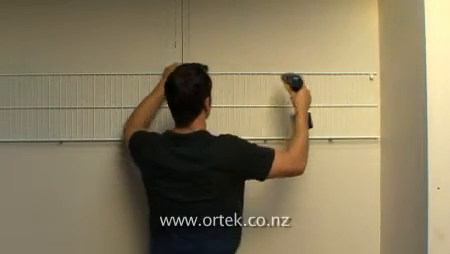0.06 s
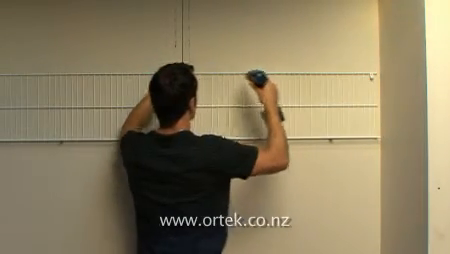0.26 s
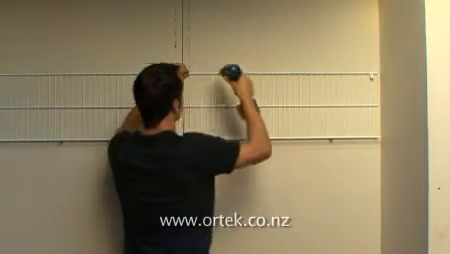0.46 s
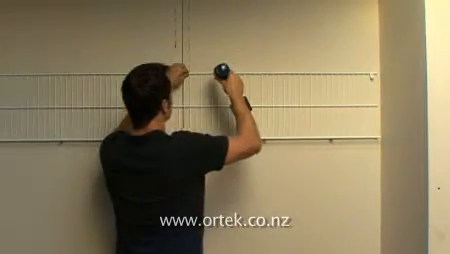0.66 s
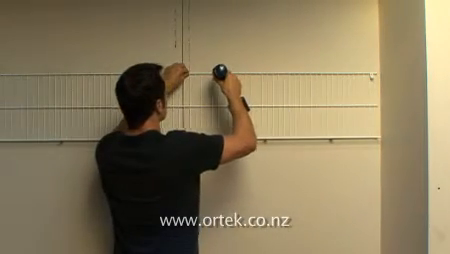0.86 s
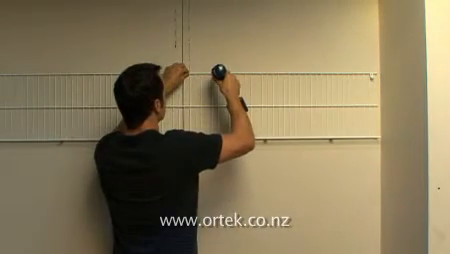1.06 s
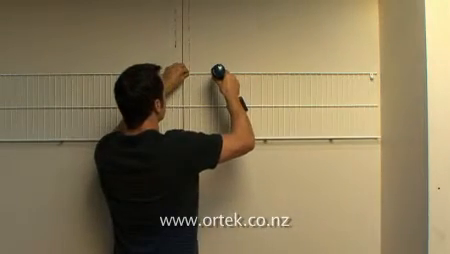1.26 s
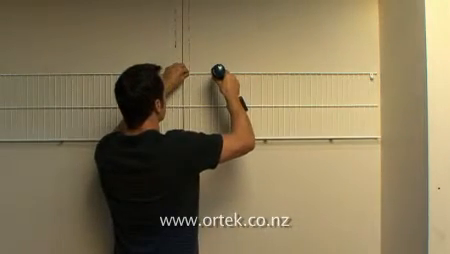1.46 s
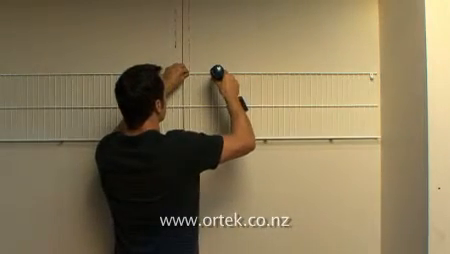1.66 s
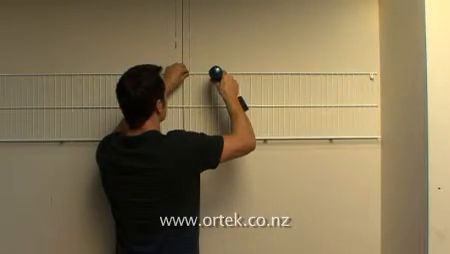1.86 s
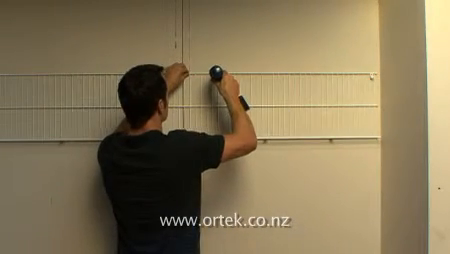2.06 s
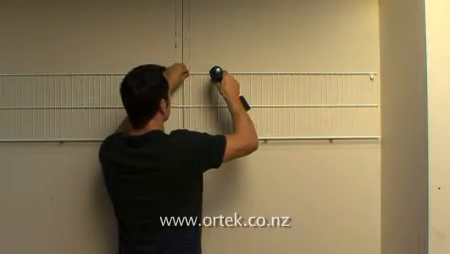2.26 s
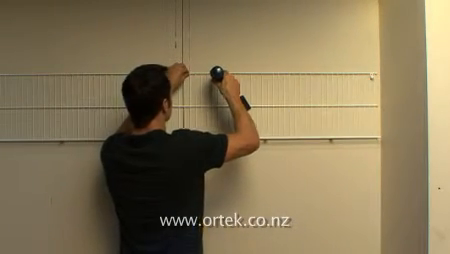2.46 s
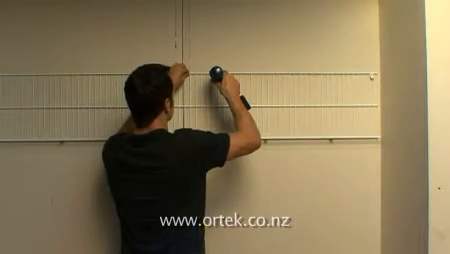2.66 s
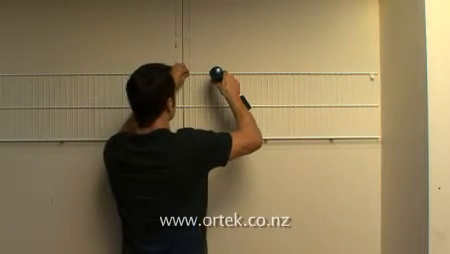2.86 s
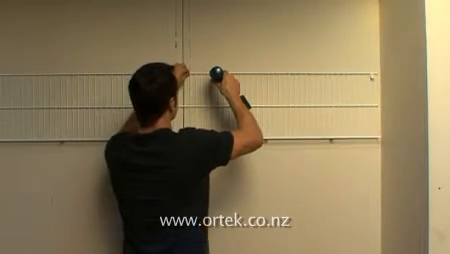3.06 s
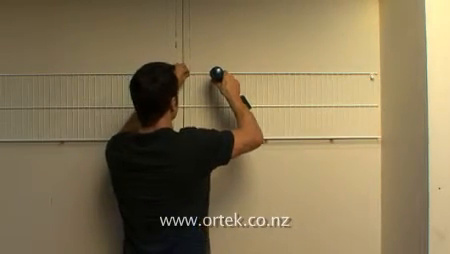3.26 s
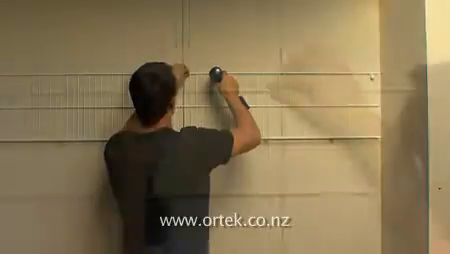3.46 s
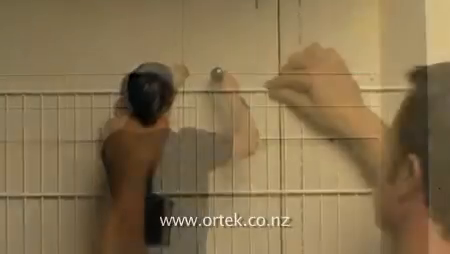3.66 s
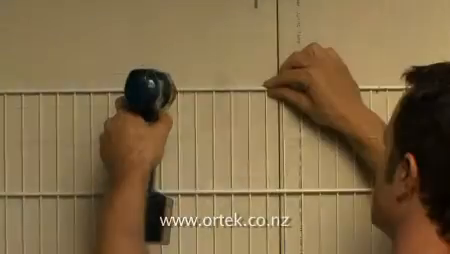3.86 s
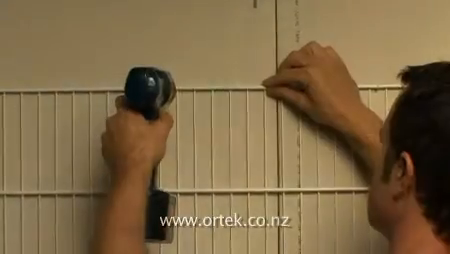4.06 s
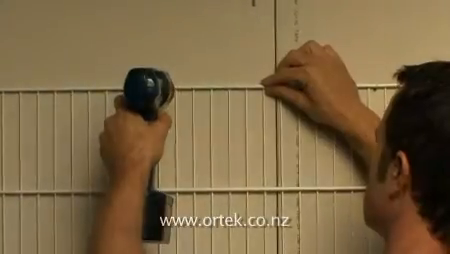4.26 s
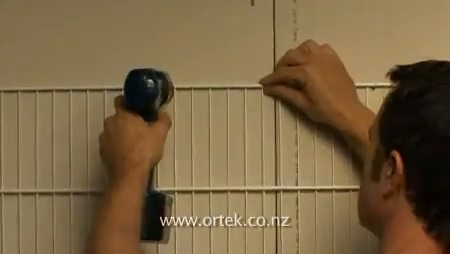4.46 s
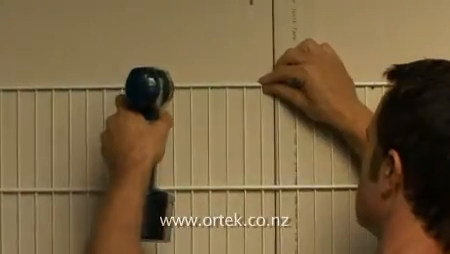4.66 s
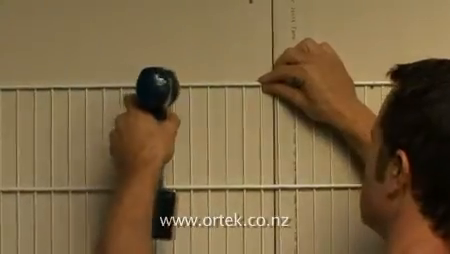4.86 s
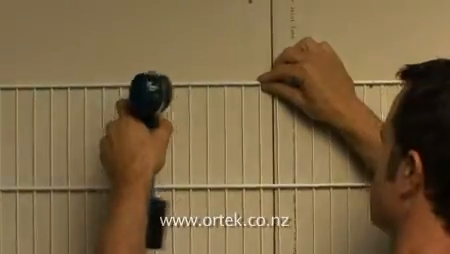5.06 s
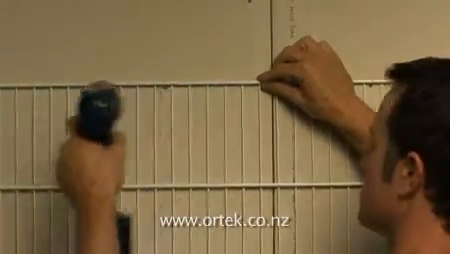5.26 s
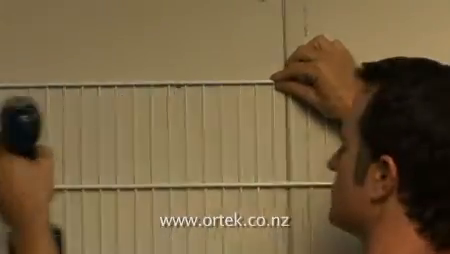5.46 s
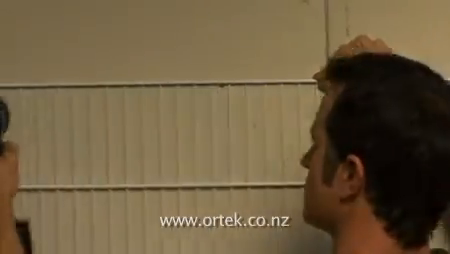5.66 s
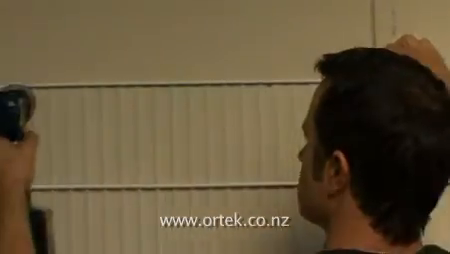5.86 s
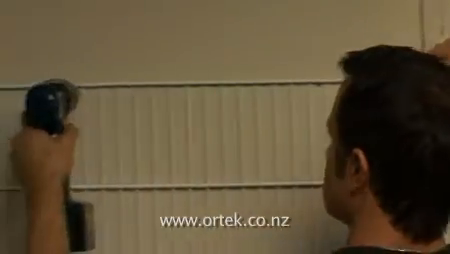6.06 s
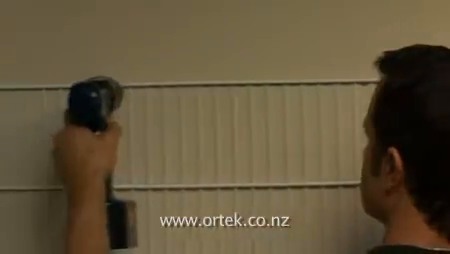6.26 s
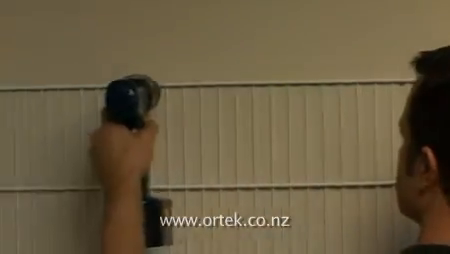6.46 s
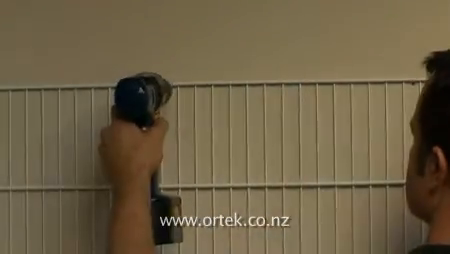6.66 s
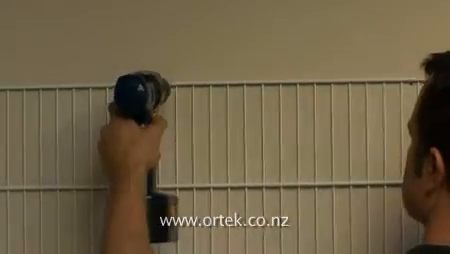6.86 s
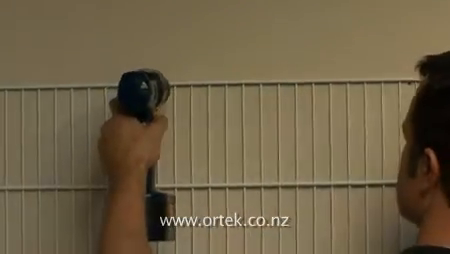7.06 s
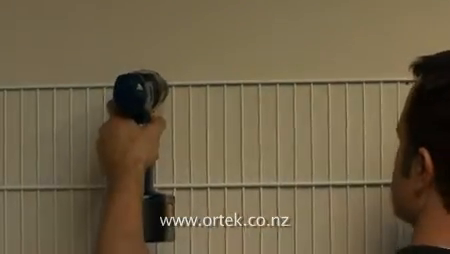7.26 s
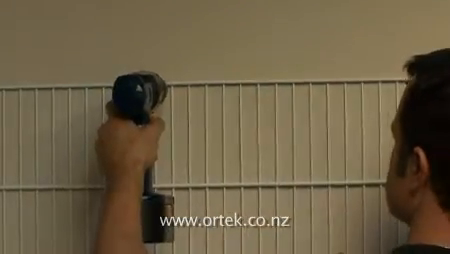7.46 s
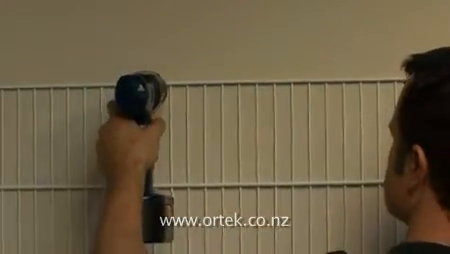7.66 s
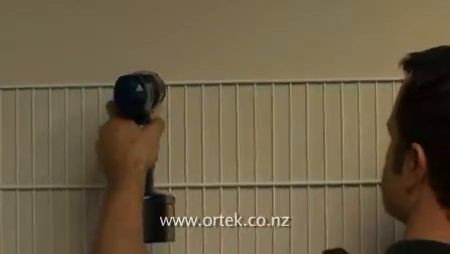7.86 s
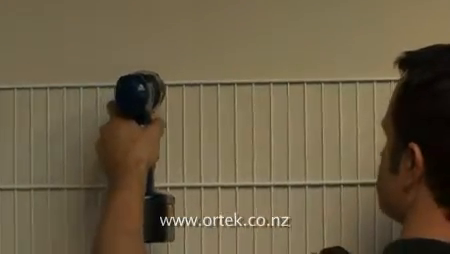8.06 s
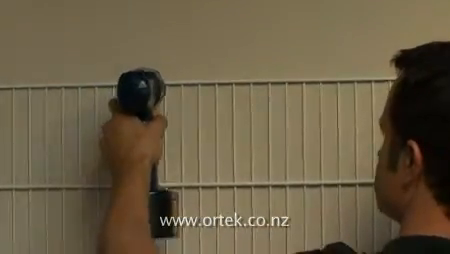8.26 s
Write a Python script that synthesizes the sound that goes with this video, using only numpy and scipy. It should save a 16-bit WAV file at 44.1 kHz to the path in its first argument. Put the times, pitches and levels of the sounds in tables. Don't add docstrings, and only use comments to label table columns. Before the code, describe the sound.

A cordless drill works on plasterboard in a small boxy space, picked up by a camera microphone. Quiet hiss, low stirring and dull bumps come first, then a somewhat distant drill run with rising motor whine and gear rattle. The scene changes and a short, brighter, closer run follows, stopping sharply. Fist bumps and a wire rattle fill the pause before a last close run, with an early thump through the wall.

```python
import sys
import numpy as np
from scipy import signal
from scipy.fft import rfft, irfft, next_fast_len
from scipy.io import wavfile
from scipy.ndimage import uniform_filter1d

SR = 44100
rng = np.random.default_rng(int(sys.argv[2]) if len(sys.argv) > 2 else 0)


def put_to_file(sound):
    columns = np.atleast_2d(sound).T
    safe = np.clip(columns, -1, 1)
    whole_steps = np.round(safe * 32767)
    wavfile.write(sys.argv[1], SR, whole_steps.astype(np.int16))


def gain_from_decibels(decibels):
    exponent = np.asarray(decibels, float) / 20
    return 10 ** exponent


N = 366912
T = np.arange(N) / SR

# f/Hz, level per Hz/dB
NOISE_FAR = [(24, -47), (40, -23), (107, 1), (154, -5.5), (404, 0), (502, -4.5), (566, 0.5), (654, -11.5),
             (853, -4.5), (1350, -12), (1890, -8.5), (2080, -11.5), (3370, -7), (11800, -14.5),
             (12700, -12), (16500, -58), (22000, -120)]
# f/Hz, width/Hz, lift/dB
HOUSING = [(3180, 280, 5), (3450, 150, 4), (4040, 200, 1.5), (5100, 660, 4), (6580, 97, 8.5),
           (7860, 135, 7), (11500, 590, 3)]


def unit(x):
    return x / np.sqrt(np.mean(x ** 2) + 1e-20)


def along(points, hz):
    f, v = np.transpose(points)
    return np.interp(np.log(hz + 1), np.log(f + 1), v)


def filtered(x, response):
    m = next_fast_len(len(x) + SR // 2)
    return irfft(rfft(x, m) * response(np.fft.rfftfreq(m, 1 / SR)), m)[:len(x)]


def wobble(n, rate):
    knots = rng.standard_normal(int(n * rate / SR) + 2)
    curve = np.interp(np.arange(n) * rate / SR, np.arange(len(knots)), knots)
    return uniform_filter1d(curve, int(SR / rate / 2) + 1)


def peaks_db(modes, hz):
    return sum(db / (1 + (2 * (hz - c) / w) ** 2) for c, w, db in modes)


def resonances(modes):
    def response(f):
        total = 0
        for k, (c, w, db) in enumerate(modes):
            total = total + (-1) ** k * gain_from_decibels(db) * 1j * f * w / (c * c - f * f + 1j * f * w)
        return total
    return response


def patchy(x, depth_db):
    z = signal.stft(x, nperseg=256)[2]
    field = uniform_filter1d(rng.standard_normal(z.shape), size=3, axis=0)
    field = uniform_filter1d(field, size=12, axis=1)
    return signal.istft(z * gain_from_decibels(depth_db * unit(field)), nperseg=256)[1][:len(x)]


def add(track, s, x):
    k = round(s * SR)
    track[k:k + len(x)] += x[:len(track) - k]


def drill():
    # t/s, motor load level/dB, pressure on the wall level/dB
    efforts = [
        [(2.03, -52, -57), (2.07, -46.5, -49), (2.16, -34, -51), (2.24, -33.5, -41.5), (2.6, -32, -35.5),
         (2.85, -32.5, -38.5), (3.05, -31.5, -36), (3.3, -33, -37.5), (3.628, -34, -38.5)],
        [(3.96, -49, -44), (4, -49, -42.5), (4.1, -36, -51), (4.17, -33, -43.5), (4.56, -32, -44),
         (4.82, -32.5, -38), (5, -33, -38.5), (5.085, -33, -35.5), (5.105, -43, -36)],
        [(6.93, -54, -59), (6.98, -43.5, -54), (7.09, -35, -43), (7.16, -30.5, -37.5), (7.24, -31, -30),
         (7.33, -30, -36), (7.7, -31, -37.5), (8.2, -32, -39), (8.32, -29.5, -37)],
    ]
    # start t/s, top speed/(turns/s), climb/(turns/s), climb time/s,
    # climb shape, creep/(turns/s), creep time/s
    spin_up = [(2.04, 357.7, 190, .14, .98, 97.96, 1.219),
               (3.97, 375.76, 182.5, .1447, 1.67, 114.24, 2.962),
               (6.94, 299.74, 154.18, .1576, 1.686, 68.04, .415)]
    pattern_lengths = (1.5, 1, 1)
    # rattle level/dB, air level/dB
    rattle_air = [(-5, -2), (-2.5, 2), (-4, -1)]
    # multiple of shaft speed, level off resonance/dB
    orders_free = [(2, -55.5), (5, -51), (6, -44.5), (8, -49.5), (10, -54), (12, -56), (14, -53),
                   (16, -54.5), (18, -53), (20, -54.5), (20.67, -60), (21.33, -60), (22, -50.5), (24, -53),
                   (24.67, -59), (30, -57), (32, -59), (32.67, -60), (34.67, -61), (36, -62), (36.67, -64),
                   (37.33, -66), (38.67, -65)]
    # multiple of shaft speed, level off resonance in second run/dB, in third run/dB
    orders_geared = [(1, -54, -50), (3, -58, -62), (5, -50.5, -55), (6, -47.5, -48.5), (7.5, -50, -47),
                     (9, -47, -46), (11, -55, -62), (12, -54, -52), (15, -47, -45.5), (18, -58, -54),
                     (21, -53, -54), (23, -55, -57), (24, -47.5, -49.5), (26, -60, -56), (27, -52, -49),
                     (28, -53, -48.5), (29, -63, -54), (30, -56, -54), (32, -57, -57), (33, -54, -54),
                     (34, -58, -56), (35, -56, -57), (36, -52.5, -52.5), (37, -57.5, -64), (38, -66, -58),
                     (39, -52, -52), (40, -68, -64), (41, -64, -62), (42, -64, -60)]
    # f/Hz, level per Hz/dB
    noise_near = [(24, -48), (40, -26.5), (91, -12.5), (288, -14), (670, -12), (853, -3.5), (1600, -11),
                  (1720, -8), (3450, -1), (3890, -2.5), (4180, -1), (5590, -7), (6610, -9), (11500, -13.5),
                  (12700, -13), (16500, -52), (22000, -120)]
    noise, tones = np.zeros((2, N))
    multiple, second_db, third_db = np.transpose(orders_geared)
    stacks = (np.transpose(orders_free), (multiple, second_db), (multiple, third_db))
    spectra = (NOISE_FAR, noise_near, noise_near)
    runs = zip(spin_up, stacks, pattern_lengths, efforts, rattle_air, spectra)
    for law, orders, pattern_turns, effort, offsets_db, spectrum in runs:
        rush, song = run(law, orders, pattern_turns, effort, offsets_db, spectrum)
        add(noise, effort[0][0], rush)
        add(tones, effort[0][0], song)
    return noise, tones


def run(law, orders, pattern_turns, effort, offsets_db, spectrum):
    # low f/Hz, high f/Hz
    bands = [(2500, 6000), (40, 600), (600, 2500), (6000, 13000)]
    # f/Hz, width/Hz, lift/dB
    singing = [(555, 190, 20), (640, 90, -24), (810, 130, 14), (1975, 150, 8), (3200, 320, 9),
               (4105, 250, 17.5), (4315, 130, 8), (5750, 800, 7), (6340, 200, 8), (6640, 260, 13),
               (7090, 80, 8), (7680, 420, 8), (8110, 200, 6), (11600, 650, 12)]
    s, *cols = np.transpose(effort)
    t = np.arange(s[0], s[-1], 1 / SR)
    n = len(t)
    load_db, wall_db = [np.interp(t, s, c) for c in cols]
    turns = spin(law, t)
    octaves = np.log2(turns / turns.max())
    angle = 2 * np.pi * np.cumsum(turns * (1 + 0.00042 * wobble(n, 39.9))) / SR
    noise, tones = np.zeros((2, n))

    rattle_db = load_db + offsets_db[0] - 2 * octaves
    air_db = load_db + offsets_db[1] + 2.5 * octaves
    throb = 1 + .35 * np.cos(angle) + .3 * np.cos(2 * angle + 1.3)
    rattle = gain_from_decibels(-9) * meshing(angle, pattern_turns)
    for (lo, hi), db in zip(bands, [load_db, wall_db, rattle_db, air_db]):
        rush = rng.standard_normal(n)
        if lo > 2000:
            rush = rush * throb + rattle

        def band(hz):
            edges = np.sqrt((1 + (lo / (hz + 1)) ** 8) * (1 + (hz / hi) ** 8))
            return gain_from_decibels(along(spectrum, hz)) * housing(hz) / edges
        flutter_db = 1.88 * wobble(n, 25.05) + 0.43 * wobble(n, 6.96)
        noise += gain_from_decibels(db - 3.5 + flutter_db) * unit(filtered(rush, band))

    drive_db = .6 * (load_db - np.median(load_db))
    lift_db = peaks_db(singing, np.arange(SR // 2))
    for order, db in zip(*orders):
        speed_db = 20 * min(order / 18, 1) * octaves
        sung_db = lift_db[(order * turns).astype(int)]
        unsteady_db = 1.2 * wobble(n, 8) + 2 * wobble(n, 19.46)
        level_db = db + drive_db + speed_db + sung_db + unsteady_db
        tones += gain_from_decibels(level_db + 2.5) * np.sin(order * angle + 2 * np.pi * rng.random())
    fade = np.clip(np.minimum((t - s[0]) / 0.011, (s[-1] - t) / 0.0023), 0, 1)
    return np.array([patchy(noise, depth_db=1.5), tones]) * fade


def spin(law, t):
    bind_s, sag = 4.99, 2500
    start, top, climb, climb_s, shape, creep, creep_s = law
    u = np.maximum(t - start, 0)
    bound = np.maximum(t - bind_s, 0) * (start < bind_s)
    return top - climb * np.exp(-(u / climb_s) ** shape) - creep * np.exp(-u / creep_s) - sag * bound ** 2


def meshing(angle, pattern_turns):
    place = (angle / (2 * np.pi * pattern_turns) % 1 * 128).astype(int)
    patterns = rng.standard_normal((5, 128))[:, place]
    shares = np.array([wobble(len(angle), 6) for _ in patterns])
    return (shares * patterns).sum(0) / np.linalg.norm(shares, axis=0)


def housing(hz):
    return gain_from_decibels(peaks_db(HOUSING, hz))


def whines():
    # t/s, level/dB
    presses = [
        (2.009, -56),
        (3.932, -57),
        (6.906, -55.5),
    ]
    overtones_db = (-6, -14)
    start_hz, rise_hz_per_s, length_s, swell_db = 3370, 3300, .11, 8
    track, t = np.zeros(N), np.arange(round(length_s * SR)) / SR
    for s, db in presses:
        angle = 2 * np.pi * (start_hz + rise_hz_per_s * t / 2) * t + 1.6 * wobble(len(t), 197)
        buzz = np.zeros(len(t))
        for k, level in enumerate((0, *overtones_db), 1):
            buzz += gain_from_decibels(level + 2.0 * wobble(len(t), 110)) * np.sin(k * angle)
        fade = np.clip(np.minimum(t / 0.0042, (length_s - t) / .03), 0, 1)
        add(track, s, gain_from_decibels(db + swell_db * t / length_s) * fade * buzz)
    return track


def squeals():
    # t/s, peak level/dB, f/Hz, length/s, octave level/dB
    slips = [(0.154, -41.5, 324, 0.041, -13), (0.201, -49, 321.5, 0.078, -16), (6.393, -60, 428, .05, -9),
             (3.467, -21, 1460, 0.011, -29), (3.476, -23, 1456, 0.015, -27.5),
             (3.488, -23.5, 1400, 0.0094, -29), (3.495, -28, 1400, 0.02, -31),
             (3.515, -33, 1460, 0.0074, -28), (3.568, -18, 4940, .008, -29),
             (3.573, -12, 5080, 0.0046, -18), (3.588, -21.5, 5100, 0.0091, -23),
             (3.612, -32.5, 5180, .003, -16), (4.108, -33, 4100, 0.0096, -21),
             (4.11, -29.5, 3100, 0.028, -27), (6.938, -43, 5100, 0.016, -25),
             (8.307, -17.5, 6480, 0.0067, -32), (8.299, -21, 3960, 0.0067, -30),
             (8.31, -13, 3110, 0.0086, -24), (8.315, -15, 3450, 0.0046, -22)]
    track = np.zeros(N)
    for s, db, hz, length, octave_db in slips:
        u = np.arange(round(3 * length * SR)) / SR / length
        angle = 2 * np.pi * hz * u * length * (1 + 0.0092 * u) + 1.4 * wobble(len(u), 218)
        tone = np.sin(angle) + gain_from_decibels(octave_db) * np.sin(2 * angle)
        add(track, s, gain_from_decibels(db) * 4 * u * np.exp(1 - 4 * u) * tone)
    return track


def metal():
    # t/s, peak level/dB
    clicks = [(1.9669, -48), (2.0383, -37), (3.9709, -43.5), (5.084, -22), (6.8803, -50.5), (6.8922, -48),
              (6.94, -41), (6.9548, -44)]
    # t/s, peak level/dB
    clinks = [
        (1.3285, -45.5),
        (6.3871, -34),
    ]
    # f/Hz, width/Hz, level/dB
    wire_sets = [
        [(2390, 320, -2.5), (5100, 200, 4), (5700, 560, -1), (7740, 800, -6)],
        [(2100, 320, -15), (2640, 26, 5), (4900, 270, -5.5), (5400, 60, -3), (6030, 480, -7), (7160, 270, 0.5),
         (7840, 440, -5), (11100, 900, -19)],
    ]
    track, t = np.zeros(N), np.arange(SR // 2) / SR
    case = resonances([(hz, 1.6 * width, db) for hz, width, db in HOUSING])
    for s, db in clicks:
        snap = gain_from_decibels(db - 6.5 - 60 * t / 0.037) * rng.standard_normal(len(t))
        add(track, s, filtered(snap, case))
    for (s, db), wires in zip(clinks, wire_sets):
        decay = gain_from_decibels(-60 * t / 0.37) + 0.55 * gain_from_decibels(-60 * t / 0.034)
        rattle = decay * rng.standard_normal(len(t))
        add(track, s, gain_from_decibels(db - 0.5) * filtered(rattle, resonances(wires)))
    return track


def bumps():
    # t/s, peak level/dB, hardness level/dB
    knocks = [(0.718, -59, 2), (1.232, -33.5, -14), (1.358, -58, -13), (1.531, -35.5, -28),
              (1.654, -54, -14), (1.827, -50, -11), (1.88, -51, -23), (5.128, -36, -6), (5.23, -56, -20),
              (5.459, -51, -5.5), (6.499, -45, -12), (6.549, -34.5, -22), (6.575, -48, -7)]
    # t/s, peak level/dB, hardness level/dB
    breakthrough = (7.189, -19, 4)
    # f/Hz, width/Hz, level/dB
    panel = [(104, 9, 3), (127, 10, 3), (230, 90, -12), (480, 120, -13), (880, 200, -12)]
    push, crack, t = np.zeros(N), np.zeros(N), np.arange(SR // 20) / SR
    for s, db, hard_db in [*knocks, breakthrough]:
        contact = np.hanning(180 if hard_db < 0 else 30) / 40
        add(push, s, gain_from_decibels(db + 39.5) * contact)
        add(crack, s, gain_from_decibels(db + hard_db + 9.5 - 60 * t / 0.088) * rng.standard_normal(len(t)))

    def crack_band(f):
        return 1j * f / 300 / (1 + 1j * f / 300) / (1 + 1j * f / 2300) ** 3
    return filtered(push, resonances(panel)) + filtered(crack, crack_band)


def tail():
    # f/Hz, time/s
    decay_times = [(100, 1), (500, 0.27), (2000, 0.44), (5000, 0.41), (12000, 0.2)]
    hz, t, z = signal.stft(rng.standard_normal(SR * 3 // 4), SR, nperseg=256)
    decay = gain_from_decibels(-60 * t / along(decay_times, hz)[:, None])
    x = signal.istft(z * decay, SR, nperseg=256)[1]
    return x / np.linalg.norm(x)


def room(send):
    before = T < 3.628

    def answer(part):
        return signal.fftconvolve(np.pad(part, (200, 0)), tail())[:N]
    return answer(send * before) * before + answer(send * ~before)


def background():
    # f/Hz, level per Hz/dB
    hush_spectrum = [(15, -42), (25, -19), (71, -3), (108, 0), (172, -20.5), (235, -8.5), (275, -22),
                     (357, -20), (541, -13), (601, -18), (936, -21.5), (7520, -27.5), (12700, -30.5),
                     (16500, -56.5), (22000, -120)]
    # t/s, level/dB
    stir_levels = [
        [(0.0, -47.5), (0.66, -61), (2.05, -61)],
        [(3.64, -55), (3.76, -63), (3.95, -63)],
        [(5.15, -63), (5.78, -65.5), (6.92, -62.5)],
    ]
    stir_spectrum = [(40, -37), (100, 0.0), (300, -4.0), (600, -11.0), (1200, -31.0)]  # f/Hz, level/dB
    hush = unit(filtered(rng.standard_normal(N), lambda hz: gain_from_decibels(along(hush_spectrum, hz))))
    s, db = np.transpose(np.vstack(stir_levels))
    stir = unit(filtered(rng.standard_normal(N), lambda hz: gain_from_decibels(along(stir_spectrum, hz))))
    echo = np.pad(tail(), (0, N))[:N]
    echo = filtered(echo, lambda hz: gain_from_decibels(along(NOISE_FAR, hz) - hz / 1500) * housing(hz))
    echo = gain_from_decibels(-8) * echo / np.linalg.norm(echo)
    return gain_from_decibels(-62) * hush + gain_from_decibels(np.interp(T, s, db) - 3.5) * stir + echo


def scene():
    noise, tones = drill()
    sources = np.array([noise, tones, squeals() + whines(), metal(), bumps()])
    wet = gain_from_decibels([-5.5, -15, -6.5, -11.5, -7]) @ sources
    mono = sources.sum(0) + room(wet) + background()
    return np.array([mono, mono])


def low_pass(x):
    return signal.sosfilt(signal.butter(12, 12820, fs=SR, output="sos"), x)


def record(dry):
    dull = filtered(dry[0], lambda hz: 1 / (1 + (hz / 12800) ** 60))
    return low_pass(np.array([dull, dull]))


dry = scene()
out = record(dry)
put_to_file(out)
```